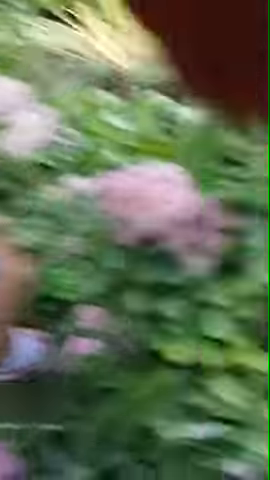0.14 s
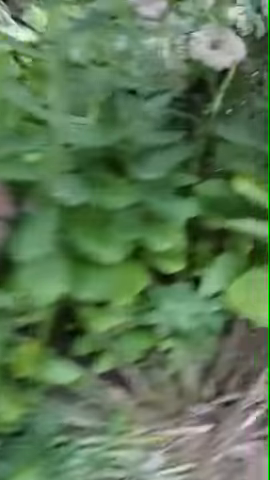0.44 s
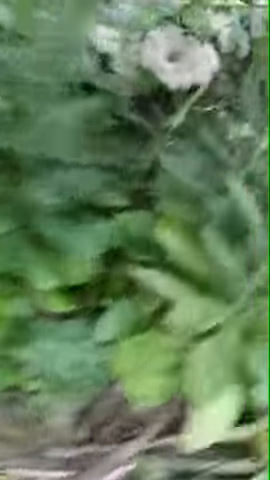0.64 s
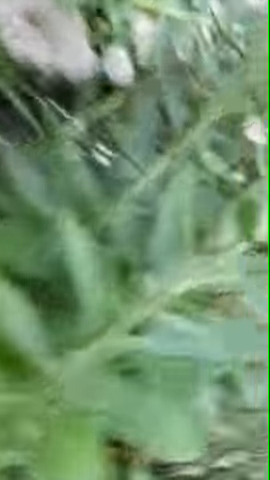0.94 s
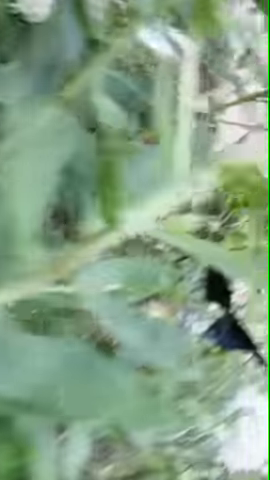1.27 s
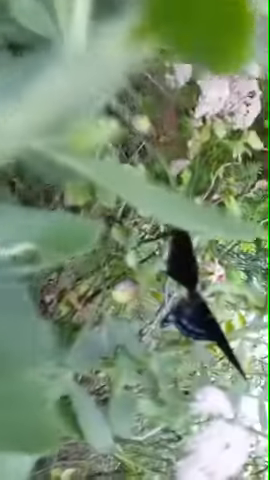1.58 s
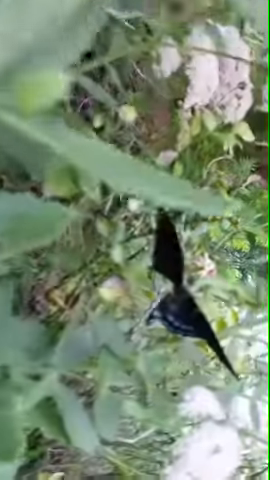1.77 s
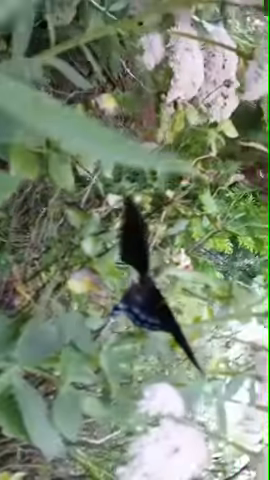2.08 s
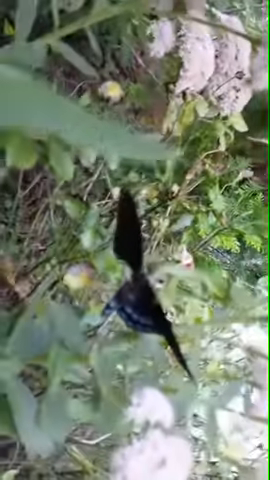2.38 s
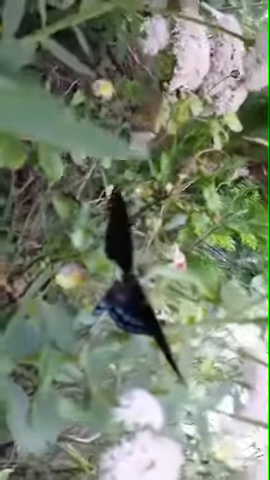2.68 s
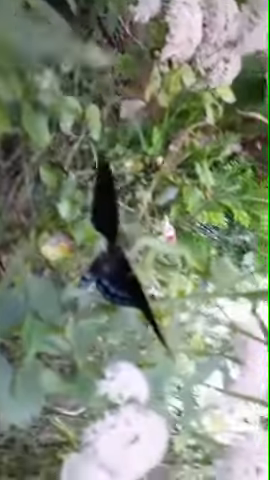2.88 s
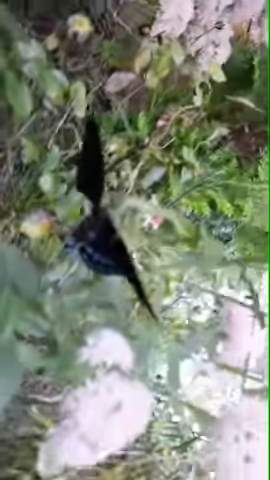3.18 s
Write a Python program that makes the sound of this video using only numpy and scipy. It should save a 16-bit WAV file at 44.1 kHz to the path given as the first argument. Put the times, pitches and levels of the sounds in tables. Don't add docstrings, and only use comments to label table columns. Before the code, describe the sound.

Steady high cricket trilling outdoors in stereo, over faint distant aircraft rumble. Stems crackle and snap mostly in the first 1.3 seconds, then calmer; near the end the right side pops and turns muffled.

```python
import sys
import numpy as np
from scipy import signal
from scipy.fft import rfft, irfft, next_fast_len
from scipy.io import wavfile
from scipy.ndimage import uniform_filter1d, map_coordinates

SR = 44100
rng = np.random.default_rng(int(sys.argv[2]) if len(sys.argv) > 2 else 0)


def pcm_store(signal):
    levels = np.round(np.clip(np.atleast_2d(signal), -1, 1) * 32767)
    wavfile.write(sys.argv[1], SR, levels.astype(np.int16).T)


def amplitude_ratio(level_db):
    exponent = np.asarray(level_db, float) / 20
    return 10 ** exponent


N = 146412
T = np.arange(N) / SR

# (time [s], level [dB], left over right [dB])
CHORUS = [(0.0, -38.5, 6.5), (.15, -38.5, 5.5), (0.47, -38.5, 4.5), (0.56, -37, 0), (1.1, -34.5, 2),
          (1.64, -34, 2), (1.72, -34, 6), (2.25, -33.5, 3.5), (2.4, -32, 5.5), (2.6, -35, 6.5),
          (3.05, -33.5, 3.5), (3.3, -33.5, 4.5)]
# (frequency [Hz], density [dB per Hz])
WING_COLOUR = [(3530, -67), (6000, -75), (6380, -17.5), (6760, -4), (7050, 2.5), (7840, -4), (8700, -35.5),
               (11300, -47), (19100, -120)]

# (time [s], level [dB], left over right [dB], dull part [dB])
BRUSH = [(0, -50, 2, -4), (.17, -51, 0.5, -1), (.29, -43, 1.5, 2), (.37, -52, 2, 1), (.58, -42, 0.5, -4),
         (.72, -54.5, 3.5, 2.5), (1.0, -55, -3.5, -3), (1.12, -51, -12.5, -4.5), (1.24, -65.5, 21.5, -3.5),
         (1.57, -50.5, 4, -24), (1.7, -63, 14, -5.5), (2.27, -55, 6, -20), (2.35, -40, 2, -21),
         (2.5, -64.5, -27, -13), (2.75, -56.5, -14.5, -4.5), (2.84, -53, -13.5, -4), (2.95, -55, -8, -6.5),
         (3.1, -72.5, -31, 11.5)]
# (frequency [Hz], density [dB per Hz])
CRISP = [(2000, -60), (4000, -9.5), (6000, 3.5), (10000, 1.5), (14500, 0.5), (16500, -37)]
# (frequency [Hz], density [dB per Hz])
DULL = [(200, -8), (600, -1.5), (1500, -3), (2600, -4), (4000, -12), (8000, -5.5), (13500, -24.5),
        (15000, -56)]
# (time [s], peak [dB], left over right [dB], dull part [dB], length [s])
SNAPS = [(.0435, -38, .6, -7, .003), (.2962, -15.5, -3, -20, .003), (.464, -35, .6, -20, .002),
         (.4815, -26.5, .6, -13, .003), (.5972, -24.5, -1.5, -24, .003), (.6035, -24, 2.5, -22, .002),
         (.6168, -21, -1.5, -9, .002), (.638, -35, 4, -13, .003), (.668, -37, 2.5, -6, .003),
         (.7192, -34, -5, -25, .003), (.8652, -31, -15, -34, .0012), (1.1462, -22, -16, -36, .003),
         (1.1644, -40, -1.5, -20, .003), (1.2925, -36, 8, -30, .003), (2.8612, -24, -14, -25, .006)]
# (time [s], peak [dB], left over right [dB], dull part [dB], length [s])
STEM_TICKS = [(.3219, -44, 3, 6.5, .0021), (.338, -44, 5, 8, .0038), (.356, -38, 6, -10, .002),
              (.393, -39, 6, -10, .002), (.54, -36, 6, -10, .002), (.5672, -35, 3, -.5, .0026),
              (.5792, -32, 4, -7, .0016), (.681, -38, 2.5, 1.5, .003), (1.2724, -52, 1.5, 8, .003),
              (1.3585, -45, 2.5, -8, .002), (2.2983, -24, 3, -20, .0025), (2.463, -39, 5, -15, .002),
              (2.825, -38.5, -12, -6, .005)]
# (frequency [Hz], density [dB per Hz])
STEM_COLOUR = [(1500, -40), (2600, -18), (3200, 4), (5000, 8), (6300, 8), (8500, -4), (15000, -20)]

# (time [s], level [dB])
RUB = [
    (2.9, -60),
    (2.98, -57),
    (3.098, -45),
    (3.111, -32.5),
    (3.126, -25),
    (3.131, -74),
    (3.23, -36.5),
    (3.28, -59.5),
    (3.32, -46),
]
# (frequency [Hz], density [dB per Hz])
SKIN = [(25, -8), (80, 1), (250, -9.5), (700, -13.5), (2000, -27), (5000, -45), (9000, -93)]
# (time [s], level [dB], width [s])
SLIPS = [
    (3.095, -33, .00006),
    (3.1088, -28, .00012),
    (3.119, -30, .0002),
    (3.1286, -9.5, .00007),
    (3.295, -33.5, .0001),
]
# (time [s], level [dB], frequency [Hz], 60 dB decay [s])
PUSHES = [
    (3.1085, -20, 95, .05),
    (3.1318, -17, 80, .04),
]
# (frequency [Hz], gain [dB])
MUFFLE = [(100, 3.5), (600, -2.5), (1500, -32), (4000, -38), (7000, -55), (12000, -45)]

# (time [s], level [dB], left over right [dB], frequency [Hz])
THUDS = [
    (0.556, -45, -21, 55),
    (.67, -46, 6, 49.6),
    (1.12, -44, 4, 55),
    (1.882, -46, .6, 45),
    (2.811, -39, .6, 50.6),
    (2.871, -39, .6, 45.3),
]

# (start [s], length [s], rate [ticks per s], rate change [ticks per s per s], level [dB])
BUZZES = [
    (1.203, .85, 52.2, -3.4, -49),
    (2.553, .8, 52, -.5, -50),
]
# (frequency [Hz], density [dB per Hz])
BUZZ_COLOUR = [(8000, -54), (10500, -1), (11500, 13), (12600, -2), (13800, 6), (14600, -29), (15500, -32)]

# (time [s], level [dB], ground-echo hump [Hz])
PLANE = [(0, -44.5, 231), (.15, -40, 214), (.4, -41, 200), (.5, -43, 190), (.68, -37, 233),
         (.8, -43.5, 210), (1.08, -41.5, 216), (1.4, -42.5, 224), (1.87, -51, 220), (2.1, -47.5, 191),
         (2.5, -48, 200), (2.72, -46.5, 290), (3.1, -52.5, 246), (3.27, -47.5, 288)]
# (frequency [Hz], density [dB per Hz])
ROAR = [(25, -13), (50, -2.5), (100, -5.5), (300, -4), (560, -12.5), (750, -30), (1500, -28.5), (3500, -39)]
# (frequency [Hz], correlation [-1 to 1])
ALIKE = [(60, 0.94), (240, 0.99), (950, 0.67), (3770, -0.31), (15000, -0.24)]
# (frequency [Hz], density [dB per Hz])
AIR = [(300, -10), (1000, -8.5), (2500, -23), (3800, -24), (5400, 0.5), (8600, 0), (11000, -6), (14500, -3)]

TOP_HZ = 14600


def unit(x):
    return x / np.sqrt(np.mean(x ** 2) + 1e-20)


def along(points, hz):
    f, v = np.transpose(points)
    return np.interp(np.log(hz + 1), np.log(f + 1), v)


def curves(rows):
    s, *cols = np.transpose(rows)
    return [np.interp(T, s, c) for c in cols]


def wobble(rate):
    knots = rng.standard_normal(int(N * rate / SR) + 4)
    return map_coordinates(knots, [T * rate])


def filtered(x, response):
    m = next_fast_len(x.shape[-1] + 8192)
    spectrum = rfft(x, m) * response(np.fft.rfftfreq(m, 1 / SR))
    return irfft(spectrum, m)[..., :x.shape[-1]]


def coloured(x, points):
    return unit(filtered(x, lambda hz: amplitude_ratio(along(points, hz))))


def panned(pan_db):
    return np.array([amplitude_ratio(pan_db / 2), amplitude_ratio(-pan_db / 2)])


def pair(patchy_db):
    z = signal.stft(rng.standard_normal((2, N)), nperseg=512)[2]
    patches = uniform_filter1d(rng.standard_normal(z.shape[1:]), 5, 0)
    patches = uniform_filter1d(patches, 12, 1)
    two = signal.istft(z * amplitude_ratio(patchy_db * unit(patches)), nperseg=512)[1][:, :N]

    def mid_and_side(hz):
        angle = np.arccos(np.clip(along(ALIKE, hz), -1, 1)) / 2
        return np.array([np.cos(angle), np.sin(angle)])

    mid, side = filtered(two, mid_and_side)
    return np.array([mid + side, mid - side])


def strokes(rate, hz, length_s, waver):
    jitter = 0.12
    draw = rng.standard_normal((len(hz), int(N / SR * 90), 3))
    count = np.arange(draw.shape[1]) + rng.random((len(hz), 1))
    at = (count + jitter * draw[..., 0]) / rate[:, None]
    heard = (at > 0) & (at < N / SR)
    tone = (hz[:, None] * (1 + waver * draw[..., 1]))[heard][:, None]
    strength = amplitude_ratio(0.31 * draw[..., 2][heard][:, None])
    k = np.arange(int(length_s * SR))
    swell = strength * np.sin(np.pi * k / len(k)) ** 2 * np.sin(2 * np.pi * tone * k / SR)
    place = (at[heard] * SR).astype(int)[:, None] + k
    return np.bincount(place.ravel(), swell.ravel(), N + SR)[:N]


def foliage(x):
    t60_s = 0.94
    t = np.arange(SR // 3) / SR
    tail = rng.standard_normal((2, len(t))) * amplitude_ratio(-60 * t / t60_s)
    return signal.fftconvolve(x, tail / np.linalg.norm(tail[0]), axes=1)[:, :N]


def trillers(pitch_waver):
    singers, strokes_per_s, rate_spread, stroke_s = 72, 55, 0.27, 0.0062
    pitch = np.linspace(5900, 8800, singers)
    crowd = []
    for port in range(2):
        rate = strokes_per_s * np.exp(rate_spread * rng.standard_normal(singers))
        crowd.append(strokes(rate, pitch, stroke_s, pitch_waver))
    crowd = coloured(np.array(crowd), WING_COLOUR)
    return crowd * amplitude_ratio(0.88 * np.array([wobble(5.72), wobble(5.77)]))


def near_chirper(pitch_waver):
    first_s, every_s, chirp_s = 0.095, 0.222, 0.12
    level_db, right_db, nears_db_per_s = -39, -6, 0.3
    beat = np.sin(np.pi * np.clip((T - first_s) % every_s / chirp_s, 0, 1)) ** 0.6
    song = strokes(np.array([75]), np.array([7010]), 0.011, pitch_waver / 4)
    near = unit(song) * beat * amplitude_ratio([[0], [right_db]])
    return amplitude_ratio(level_db + nears_db_per_s * (T - T.mean())) * (near + 0.39 * foliage(near))


def crickets():
    pitch_waver, overtone_db = 0.011, -33
    level_db, pan_db = curves(CHORUS)
    song = amplitude_ratio(level_db + 3) * panned(pan_db) * trillers(pitch_waver) + near_chirper(pitch_waver)
    octave = unit(filtered(song ** 2, lambda hz: hz > 9000))
    return song + amplitude_ratio(level_db.mean() + overtone_db) * octave


def rustle():
    grains_per_s, grain_spread_db, grain_db = 1600, 2, -6.5
    level_db, pan_db, dull_db = curves(BRUSH)
    size = amplitude_ratio(grain_spread_db * rng.exponential(size=(2, N)))
    struck = rng.random((2, N)) < grains_per_s / SR
    grains = unit(struck * size * rng.standard_normal((2, N)))
    rough = pair(patchy_db=3.5) + amplitude_ratio(grain_db) * (grains + 0.24 * grains[::-1])
    leaves = coloured(rough, CRISP) + amplitude_ratio(dull_db) * coloured(rough, DULL)
    return amplitude_ratio(level_db + 1.18 * wobble(34.05)) * panned(pan_db) * leaves


def snaps(rows, colour):
    break_gain, break_s, lead_s = 1.6, 0.0005, 0.01
    out = np.zeros((2, N + SR))
    t = np.arange(2048) / SR - lead_s

    def peak(v):
        return np.abs(v).max(axis=1, keepdims=True)

    for s, db, pan_db, dull_db, length_s in rows:
        noise = rng.standard_normal(len(t)) + rng.standard_normal((2, len(t)))
        splintering = np.exp(-np.abs(t) / length_s)
        sharp_break = break_gain * np.exp(-(t / break_s) ** 2)
        burst = noise * (t >= 0) * (splintering + sharp_break)
        crisp, dull = coloured(burst, colour), coloured(burst, DULL)
        sound = crisp / peak(crisp) + amplitude_ratio(dull_db + 4.5) * dull / peak(dull)
        start = round((s - lead_s) * SR)
        out[:, start:start + len(t)] += amplitude_ratio(db + 1.5) * panned(pan_db)[:, None] * sound
    return out[:, :N]


def finger():
    port_leak_db = -45
    level_db, = curves(RUB)
    touch = amplitude_ratio(level_db + 6.7 * wobble(70)) * coloured(rng.standard_normal(N), SKIN)
    for s, db, width_s in SLIPS:
        u = (T - s) / width_s
        touch = touch + amplitude_ratio(db) * (1 - u ** 2 / 3) * np.exp(-u ** 2 / 2)
    for way, (s, db, hz, t60_s) in zip((-1, 1), PUSHES):
        after = np.clip(T - s, 0, None)
        touch = touch + way * amplitude_ratio(db - 60 * after / t60_s) * np.sin(2 * np.pi * hz * after)
    return touch * amplitude_ratio([[port_leak_db], [0]])


def covered(port):
    cover_s, covered_s = 3.075, 3.128
    gap = np.clip((covered_s - T) / (covered_s - cover_s), 0, 1) ** 2.7
    muffled = filtered(port, lambda hz: amplitude_ratio(along(MUFFLE, hz)))
    return gap * port + (1 - gap) * muffled


def grip():
    thud_s = 0.022
    out = np.zeros((2, N))
    for s, db, pan_db, hz in THUDS:
        push = np.exp(-((T - s) / thud_s) ** 2) * np.sin(2 * np.pi * hz * (T - s))
        out += amplitude_ratio(db) * panned(pan_db)[:, None] * push
    return out


def katydid():
    tick_s, rise_s, right_db = 0.0013, 0.2, 2.5
    gate = np.zeros(N)
    for s, length_s, rate, change, db in BUZZES:
        t = np.clip(T - s, 0, length_s)
        since = (rate * t + change * t * t / 2) % 1 / rate
        gate += amplitude_ratio(db) * np.exp(-since / tick_s) * np.clip(t / rise_s, 0, 1) * (t < length_s)
    ticks = coloured(rng.standard_normal((2, N)) * gate * amplitude_ratio(1.4 * wobble(25.9)), BUZZ_COLOUR)
    return ticks * np.sqrt(np.mean(gate ** 2)) * amplitude_ratio([[0], [right_db]])


def aircraft():
    hump_db, hump_octaves = 7, 0.45
    drone_hz, drone_width_hz, drone_db = 113, 4, -9
    level_db, hump_hz = curves(PLANE)
    hz, t, z = signal.stft(coloured(pair(patchy_db=1.5), ROAR), SR, nperseg=2048)
    octaves_off = np.log2((hz[:, None] + 1) / np.interp(t, T, hump_hz))
    hump = np.exp(-(octaves_off / hump_octaves) ** 2)
    roar = unit(signal.istft(z * amplitude_ratio(hump_db * hump), SR, nperseg=2048)[1][:, :N])
    drone = unit(filtered(rng.standard_normal(N),
                          lambda f: 1 / (1 + ((f - drone_hz) / drone_width_hz) ** 2)))
    return amplitude_ratio(level_db + 1.5 + 0.8 * wobble(9)) * (roar + amplitude_ratio(drone_db) * drone)


def open_air():
    return amplitude_ratio(-51.5 + 0.35 * wobble(7.1)) * coloured(pair(patchy_db=0.0), AIR)


def scene():
    leaves = filtered(rustle(), lambda hz: hz < TOP_HZ)
    breaks = snaps(SNAPS, CRISP) + snaps(STEM_TICKS, STEM_COLOUR)
    garden = crickets() + leaves + breaks + grip() + katydid() + aircraft() + open_air()
    return np.array([garden[0], covered(garden[1])]) + finger()


def band_limit(x):
    return signal.sosfilt(signal.butter(12, 15990, fs=SR, output="sos"), x)


def record(dry):
    low_cut_hz, hiss_db, top_opens_db = 36, -63.5, -51
    x = filtered(dry, lambda hz: 1 / (1 + (low_cut_hz / (hz + 1)) ** 4))
    x = x + amplitude_ratio(hiss_db) * rng.standard_normal(dry.shape)
    top = filtered(x, lambda hz: hz > TOP_HZ)
    filled = uniform_filter1d((top ** 2).max(0), size=128) > amplitude_ratio(2 * top_opens_db)
    kept = np.clip(4 * uniform_filter1d(filled * 1.0, size=256), 0, 1)
    return band_limit(x - top * (1 - kept))


dry = scene()
out = record(dry)
pcm_store(out)
```